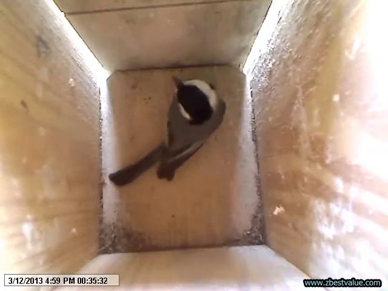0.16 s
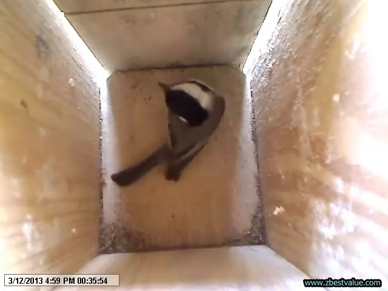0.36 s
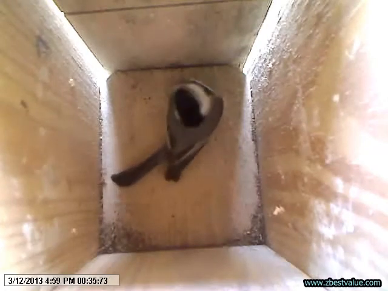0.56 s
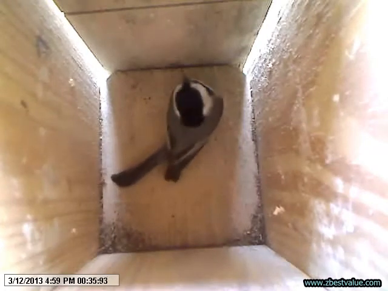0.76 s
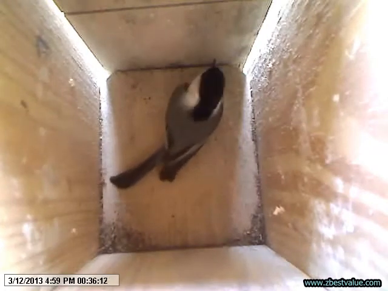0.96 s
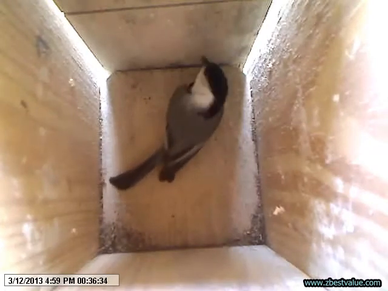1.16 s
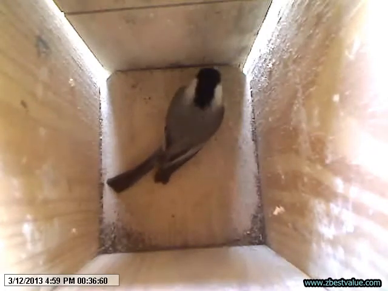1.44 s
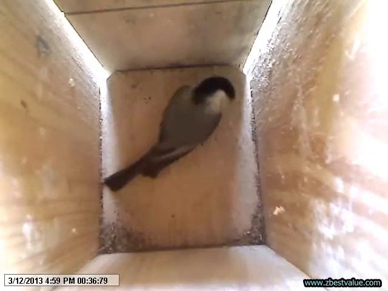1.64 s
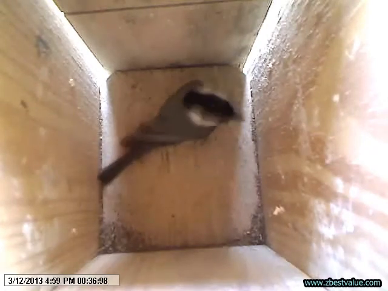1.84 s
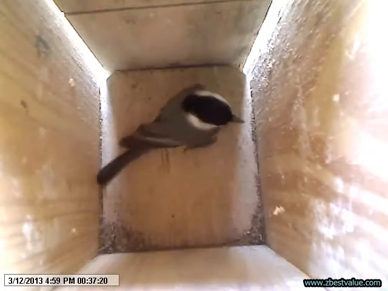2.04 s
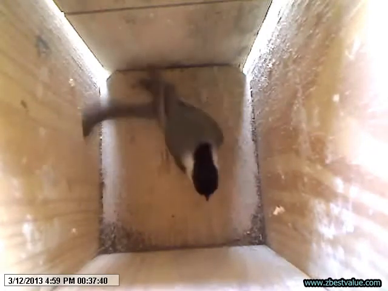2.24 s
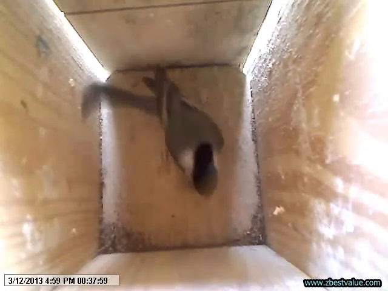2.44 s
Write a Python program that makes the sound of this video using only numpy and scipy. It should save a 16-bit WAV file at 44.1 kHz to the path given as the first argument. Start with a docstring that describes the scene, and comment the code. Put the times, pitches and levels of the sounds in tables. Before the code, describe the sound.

A low steady engine-like hum and rumble, with a small bird's light taps and scratches on wood

```python
"""First an engine's hum, idling some way off, and outdoor rumble ringing in a hollow nest box. Close by, from
about 0.8 s, a small bird rustles, then hops: short woody knocks and claw scratches. The hum is wavering sines,
the rumble filtered noise, the rustle dense tiny clicks in bands; each step strikes damped wood modes and shapes
a burst of clicks. Weak treble is thinned to warbly strands. The recording adds hiss and a steep treble cut near
8 kHz; faint bands of noise lie above the cut."""
import sys
import numpy as np
from scipy import signal
from scipy.io import wavfile
from scipy.ndimage import uniform_filter1d

SR = 44100
rng = np.random.default_rng(int(sys.argv[2]) if len(sys.argv) > 2 else 0)


def volts(x):
    """Linear amplitude factor 10**(x/20) for a level x in dB, scalar or array-like."""
    e = np.asarray(x, float) / 20
    return 10 ** e


def digitize_waveform(pressure):
    """Quantize a signal to 16-bit integers and store it at the path in sys.argv[1].

    Rows of a 2-D input are taken as channels; values are limited to [-1, 1].
    """
    field = np.atleast_2d(pressure).T
    bounded = np.clip(field, -1, 1)
    quanta = np.round(bounded * 32767).astype(np.int16)
    wavfile.write(sys.argv[1], SR, quanta)


N = 113778   # length in samples

# moments the feet touch the floor [t/s]
STEP_TIMES = [0.999, 1.58, 1.9092, 1.9504, 2.1534, 2.166, 2.2135, 2.2162, 2.2235, 2.388, 2.5226]
# one row a step [knock level/dB, scratch level/dB, scratch length/s, scratch centre f/Hz]
STEP_SOUNDS = [(-41.5, -64, 0.0162, 3300), (-54, -67.5, 0.011, 3100), (-34.5, -38, 0.006, 6440),
               (-48, -57.5, 0.007, 6200), (-37, -47, 0.01, 6700), (-45, -51, 0.014, 3200),
               (-45, -38.5, 0.017, 6200), (-30, -40.5, 0.017, 4680), (-33, -48, 0.016, 2500),
               (-44, -68, 0.0083, 6500), (-49, -54.5, 0.03, 6700)]
# modes of the wooden floor and walls [f/Hz, level relative to the knock/dB, time to fall 60 dB/s]
WOOD_MODES = [(312, -10, .08), (450, -9, .05), (560, -9, .04), (689, -2, .055), (770, -4, .04),
              (1405, -22, .05), (1700, -22, .05), (2150, -27, .05), (2460, -27, .05), (2710, -28, .05),
              (3350, -27, .04)]
MODE_SPREAD_DB = 2.5       # chance in how hard a step strikes each mode
KNOCK_SMEAR = 0.25         # share of the scratch length over which the modes set in
SCRATCH_RISE_S = 0.00035
BAND_REACH = 1.4           # step bands reach this factor either side of their centre

# feathers and claws on the move [t/s, treble level/dB, mids relative to treble/dB]
RUSTLE_LEVELS = [(.8, -92.5, 1.5), (.9, -62.5, -3), (.98, -66.5, -4), (1.03, -90.5, 4), (1.1, -65.5, -7),
                 (1.22, -98, 13.5), (1.38, -56.5, -9), (1.46, -89, 3), (1.6, -72, 5.5), (1.72, -68.5, -5.5),
                 (1.76, -51.5, -23), (1.81, -56, -8), (1.85, -55, 4.5), (1.93, -53, -5.5),
                 (1.96, -59.5, -3), (2.03, -74, 0), (2.1, -65.5, 1.5), (2.16, -48.5, 4.5),
                 (2.21, -43.5, -2), (2.26, -47.5, 3), (2.32, -50.5, -9), (2.42, -55, -3),
                 (2.49, -50.5, -11), (2.54, -47, -3.5), (2.58, -59, 0)]
# edges of the rustle's mid bands [f/Hz]
MID_EDGES = [2400, 3050, 3800, 4600, 5500]
MID_SWELL_DB = 3.5
CONTACTS_PER_S, CONTACT_SPREAD_DB = 4000, 3.0

# hollows of the box as heard from its floor [f/Hz, width/Hz, level/dB]
FLOOR_HOLLOWS = [(2050, 320, -16.5), (3155, 180, -11), (3775, 200, -4), (5620, 120, -13.5), (7530, 88, -7)]
# air resonances (+) and hollows (-) of the box [f/Hz, width/Hz, level/dB]
BOX_AIR = [(322, 108, 6), (630, 120, -7), (762.7, 179, 18), (1134, 130, -4.5), (1246, 28, 9.5),
           (1290, 62.5, -12.5), (1437, 62, 6), (1696, 190, 9.5), (2292, 270, -3), (2455, 30, 8.5),
           (2586, 41, -14.5), (2881, 76, 5.5), (3244, 110, -16.5), (3350, 170, 6), (4130, 72, 2.5),
           (3410, 30, 0), (4170, 53, -4.5), (5040, 110, -7.5), (5490, 48, -0.5), (6190, 640, 9.5),
           (6250, 61, -8), (6880, 260, 8)]

ENGINE_CYCLE_HZ = 15.09
ENGINE_WOBBLE_RAD, ENGINE_WAVER_DB = 0.03, 1.5   # phase wander per order, level wander
# engine orders, each wavering [multiple of the cycle rate, mean peak level/dB]
ENGINE_ORDERS = [(2, -46.5), (3, -53), (4, -38.5), (5, -34.5), (6, -47), (7, -44.5), (8, -57.5), (9, -48.5),
                 (10, -46.5), (12, -55), (13, -49), (14, -59.5), (15, -52.5), (16, -49), (19, -40.5),
                 (21, -56), (24, -48)]
# two other wavering tones [f/Hz, mean peak level/dB]
WHIRR_TONES = [(162.2, -47), (304.8, -47)]

# outdoor rumble before the box colours it [f/Hz, relative spectral density/dB]
RUMBLE_SPECTRUM = [(15, -3.5), (40, 2), (70, 0), (120, -6.5), (200, -11), (330, 2), (450, -35),
                   (600, -25.5), (1000, -21.5), (1300, -40.5), (2000, -34.5), (3000, -37), (4500, -39.5),
                   (7000, -62), (8000, -79.5)]
# course of the rumble inside the box [t/s, level less the overall level/dB]
RUMBLE_COURSE = [(0.0, -34), (0.04, -35.5), (2.26, -36), (2.33, -38.5), (2.43, -36.5), (2.58, -34.5)]
RUMBLE_LEVEL_DB, RUMBLE_FLICKER_DB = 0.5, 1.38   # overall level added to the course, band flicker

STRAND_FRAME, STRAND_FROM_HZ = 5632, 1100   # frame in samples; all below this frequency stays
STRAND_REACH, STRAND_BAND = 120, 24         # bins in the neighbourhood, bins sharing one chance
STRAND_CHANCE_DB = 4.5
# a line stays if it tops its neighbourhood by about this much [f/Hz, level/dB]
STRAND_OVER_NEIGHBOURS = [(1100, -10), (1900, -3), (2500, 1.5), (3500, 5), (5600, 5), (6500, 3)]
# and if it tops this absolute bar [f/Hz, level/dB]
STRAND_LOWEST = [(1100, -120), (6500, -104), (7400, -97.5), (7700, -85), (8300, -72.5)]

TREBLE_CUT_HZ, MIC_OFFSET = 7800, -0.0069
MIC_HISS_DB = -91   # before its treble is cut
# faint residue above the cut [low f/Hz, high f/Hz, steady level/dB, level relative to the treble/dB]
HIGH_RESIDUE = [(7900, 9600, -103, -35), (14600, 15720, -100, -39)]


def rms_one(x):
    """Scale to an rms of 1."""
    return x / np.sqrt(np.mean(x ** 2) + 1e-20)


def in_time(rows):
    """Columns of a table as straight lines in time."""
    s, *columns = np.transpose(rows)
    return [np.interp(np.arange(N) / SR, s, c) for c in columns]


def drift(rate_hz):
    """Slow chance of spread 1: low-passed noise, drawn every 40 samples and joined by lines."""
    r = np.exp(-2 * np.pi * rate_hz * 40 / SR)
    noise = rng.standard_normal(N // 40 + 2002)
    slow = signal.lfilter([1], [1, -2 * r, r * r], noise)[2000:]   # drop the settling
    slow = rms_one(slow - slow.mean())
    return np.interp(np.arange(N) / 40, np.arange(len(slow)), slow)


def band(x, low_hz, high_hz):
    """Keep the sound between two frequencies."""
    sos = signal.butter(2, [low_hz, high_hz], "band", fs=SR, output="sos")
    return signal.sosfilt(sos, x)


def ring(clicks, hz, t60):
    """A damped resonance: a unit click sets a decaying sine of height 1 ringing."""
    r, w = volts(-60 / (t60 * SR)), 2 * np.pi * hz / SR
    return signal.lfilter([0, np.sin(w)], [1, -2 * r * np.cos(w), r * r], clicks + 1e-18)


def hollow(x, shape):
    """The air of the box colours a sound: a chain of peaks and dips."""
    for hz, width_hz, db in shape:
        g, w = volts(db / 2), 2 * np.pi * hz / SR
        k = np.pi * width_hz / SR
        middle = -2 * np.cos(w)
        x = signal.lfilter([1 + k * g, middle, 1 - k * g], [1 + k / g, middle, 1 - k / g], x)
    return x


def contacts():
    """Dense tiny touches at chance moments, of uneven size and either sign."""
    size_db = CONTACT_SPREAD_DB * np.minimum(rng.exponential(1, N), 4)
    sizes = volts(size_db) * rng.choice([-1, 1], N)
    return sizes * (rng.random(N) < CONTACTS_PER_S / SR)


def knocks():
    """Feet land on wood: soft blows set its modes ringing, each a little late by chance."""
    knock_db, _, length, _ = np.transpose(STEP_SOUNDS)
    spread_db = rng.normal(0, MODE_SPREAD_DB, (len(STEP_TIMES), len(WOOD_MODES)))
    late = rng.random(spread_db.shape) * KNOCK_SMEAR * length[:, None]
    out = np.zeros(N)
    for k, (hz, db, t60) in enumerate(WOOD_MODES):
        clicks = np.zeros(N)
        at = ((np.array(STEP_TIMES) + late[:, k]) * SR).astype(int)
        clicks[at] = (-1) ** k * volts(knock_db + db + spread_db[:, k])
        soft = np.hanning(int(SR / hz) + 2)   # the contact lasts about a cycle
        blows = np.convolve(clicks, 4 * soft / soft.sum())[:N]
        out += band(ring(blows, hz, t60), hz / BAND_REACH, hz * BAND_REACH)
    return out


def scratches():
    """Claws scratch at each step: a band of tiny touches rises fast and dies as a half bell."""
    t = np.arange(N) / SR
    claws = hollow(contacts() + contacts() + contacts(), FLOOR_HOLLOWS)
    out = 0
    for at, (_, db, length, hz) in zip(STEP_TIMES, STEP_SOUNDS):
        rise = np.clip((t - at) / SCRATCH_RISE_S, 0, 1)
        fall = np.exp(-(np.clip(t - at, 0, 1) / length) ** 2)
        low, high = hz / BAND_REACH, hz * BAND_REACH
        out = out + volts(db) * rise * fall * rms_one(band(band(claws, low, high), low, high))
    return out


def rustle():
    """Feathers brush the walls and claws drag: tiny touches in treble and swelling mid bands."""
    treble_db, mids_db = in_time(RUSTLE_LEVELS)
    # fades in over the 0.04 s ahead of the first row
    moving = np.clip((np.arange(N) / SR - RUSTLE_LEVELS[0][0]) / 0.04 + 1, 0, 1)
    treble = rms_one(band(band(contacts(), 5500, 7700), 5900, 7490))
    mids = 0
    for low, high in zip(MID_EDGES, MID_EDGES[1:]):
        mids = mids + volts(MID_SWELL_DB * drift(12.0)) * band(contacts(), low, high)
    brushing = treble + volts(mids_db) * rms_one(mids)
    return moving * volts(treble_db) * hollow(brushing, FLOOR_HOLLOWS)


def engine():
    """An idling engine: orders of its cycle share one phase wander, each level wavers alone."""
    t = np.arange(N) / SR
    cycle = 2 * np.pi * ENGINE_CYCLE_HZ * t + ENGINE_WOBBLE_RAD * drift(0.55)
    out = 0
    for k, db in ENGINE_ORDERS:
        level = volts(db + ENGINE_WAVER_DB * drift(6.1))
        out = out + level * np.sin(k * cycle + 2 * np.pi * rng.random())
    for hz, db in WHIRR_TONES:
        level = volts(db + ENGINE_WAVER_DB * drift(7.0))
        out = out + level * np.sin(2 * np.pi * (hz * t + rng.random()))
    return out


def rumble():
    """Outdoor rumble: half-octave bands of noise, each flickering, heard through the box."""
    edges = 14 * 2 ** np.arange(0, 9.6, 0.5)
    lead = SR // 2   # the filters settle before the start
    white = rng.standard_normal((2, N + lead))   # neighbouring bands use different noise
    spectrum_hz, spectrum_db = np.transpose(RUMBLE_SPECTRUM)
    out = 0
    for k, (low, high) in enumerate(zip(edges, edges[1:])):
        density_db = np.interp(np.log(low * high) / 2, np.log(spectrum_hz), spectrum_db)
        flicker_db = RUMBLE_FLICKER_DB * (drift(6.8) + 0.88 * drift(3.2))
        out = out + volts(density_db + flicker_db) * band(white[k % 2], low, high)[lead:]
    course_db, = in_time(RUMBLE_COURSE)
    return volts(course_db + RUMBLE_LEVEL_DB) * rms_one(hollow(out, BOX_AIR))


def strands(x):
    """Thins a mixed sound: weak treble lines are removed frame by frame, leaving warbly strands."""
    window = np.sin(np.pi * (np.arange(STRAND_FRAME) + 0.5) / STRAND_FRAME)
    framing = dict(nperseg=STRAND_FRAME, noverlap=STRAND_FRAME // 2, window=window)
    hz, _, z = signal.stft(x, SR, **framing)
    around = np.sqrt(uniform_filter1d(abs(z) ** 2, size=STRAND_REACH, axis=0))
    chance = rng.standard_normal(z.shape)[np.arange(len(hz)) // STRAND_BAND]
    margin_db = np.interp(hz, *np.transpose(STRAND_OVER_NEIGHBOURS))[:, None]
    lowest_db = np.interp(hz, *np.transpose(STRAND_LOWEST))[:, None]
    bar = np.maximum(around * volts(margin_db + STRAND_CHANCE_DB * chance), volts(lowest_db))
    keep = (abs(z) > bar) | (hz[:, None] < STRAND_FROM_HZ)
    return signal.istft(z * keep, SR, **framing)[1][:N]


def scene():
    """The bird's steps and rustle close by, over the engine and the rumble; one channel."""
    bird_steps = knocks() + scratches()
    return (bird_steps + strands(rustle() + rumble()) + engine())[None]


def high_residue(dry):
    """Faint noise above the treble cut: bands of noise that follow the treble's level."""
    # treble level averaged over 0.05 s
    treble = np.sqrt(abs(uniform_filter1d(band(dry, 6000, 7600) ** 2, size=SR // 20)))
    out = 0
    for low, high, steady_db, relative_db in HIGH_RESIDUE:
        sos = signal.ellip(6, 1, 60, [low, high], "band", fs=SR, output="sos")
        noise = rms_one(signal.sosfilt(sos, rng.standard_normal(dry.shape)))
        out = out + np.hypot(volts(steady_db), volts(relative_db) * treble) * noise
    return out


def top_cut(x):
    """Nothing passes above the cut-off."""
    return signal.sosfilt(signal.butter(12, 15750, fs=SR, output="sos"), x)


def record(dry):
    """The recording: steep treble cut near 8 kHz, hiss, constant offset; then faint noise bands above the cut."""
    cut = signal.cheby2(16, 45, TREBLE_CUT_HZ * 1.04, fs=SR, output="sos")
    heard = signal.sosfilt(cut, dry)
    hiss_cut = signal.cheby2(12, 60, TREBLE_CUT_HZ, fs=SR, output="sos")
    hiss = signal.sosfilt(hiss_cut, volts(MIC_HISS_DB) * rng.standard_normal(dry.shape))
    return top_cut(heard + MIC_OFFSET + hiss + high_residue(dry))


dry = scene()
out = record(dry)
digitize_waveform(out)
```